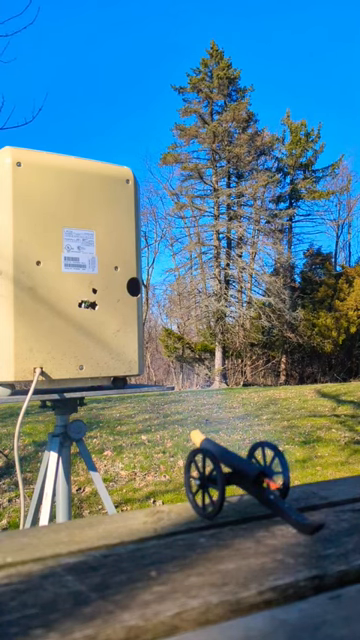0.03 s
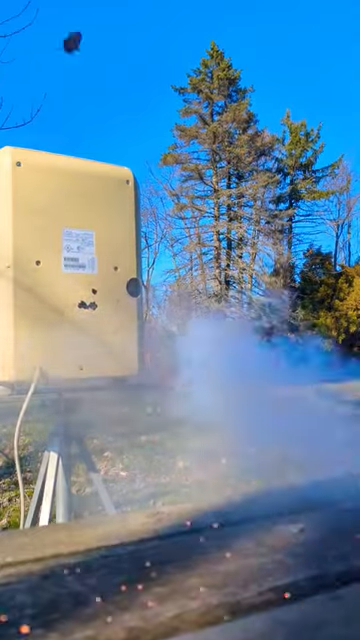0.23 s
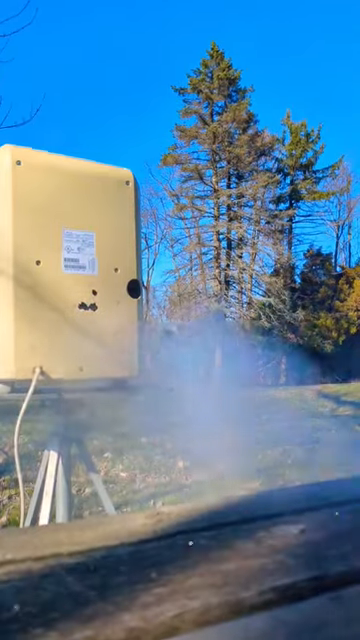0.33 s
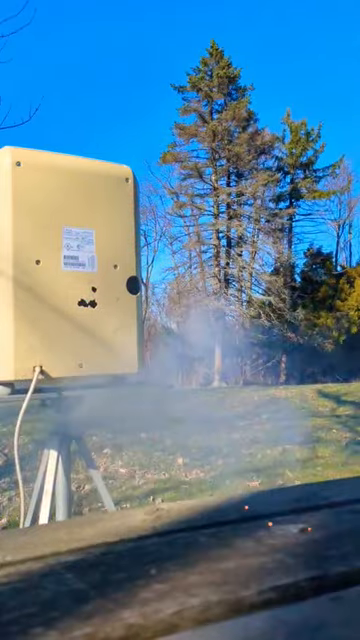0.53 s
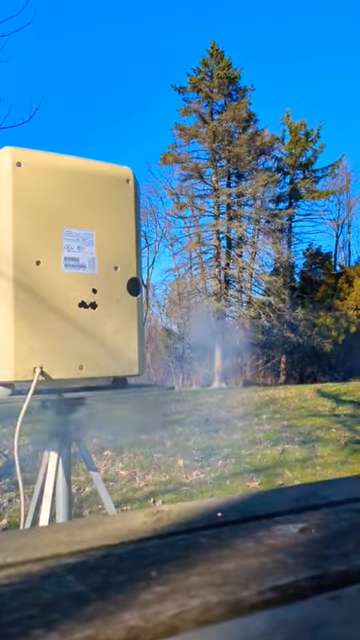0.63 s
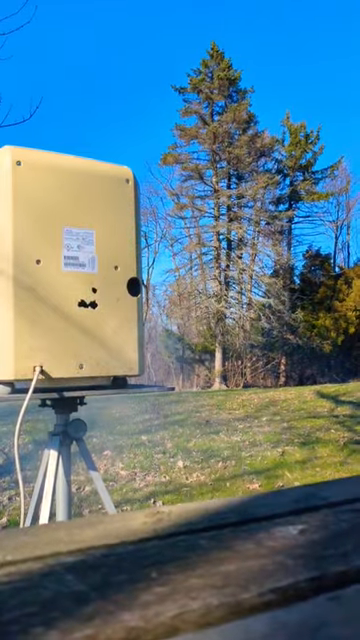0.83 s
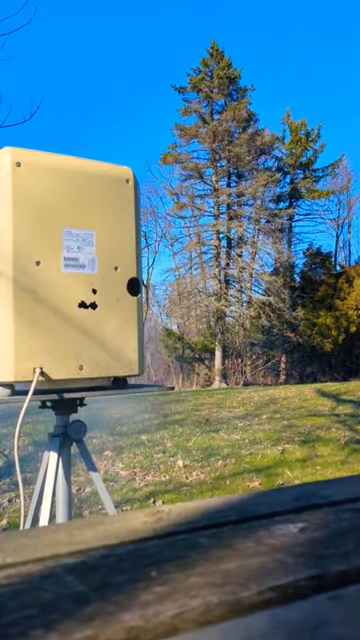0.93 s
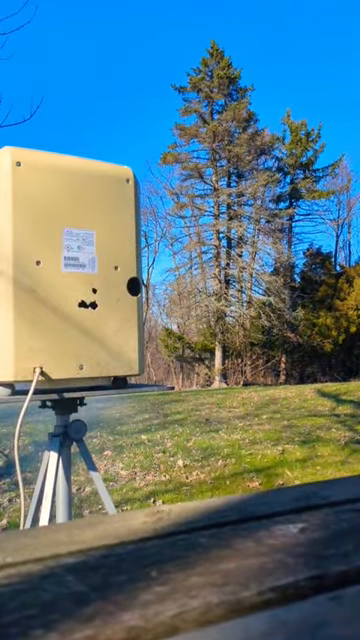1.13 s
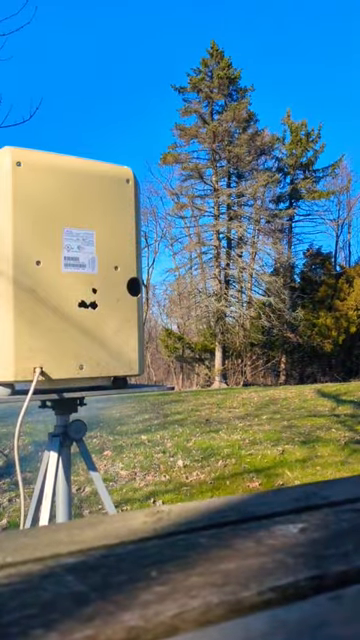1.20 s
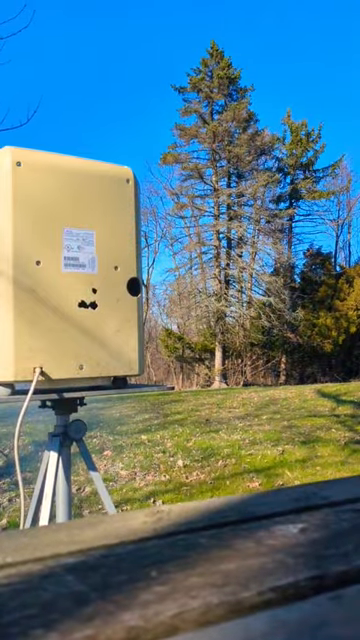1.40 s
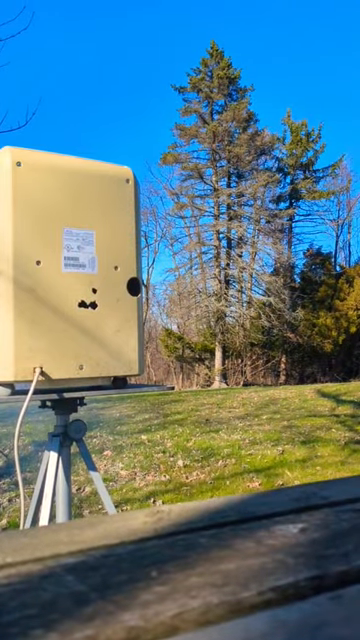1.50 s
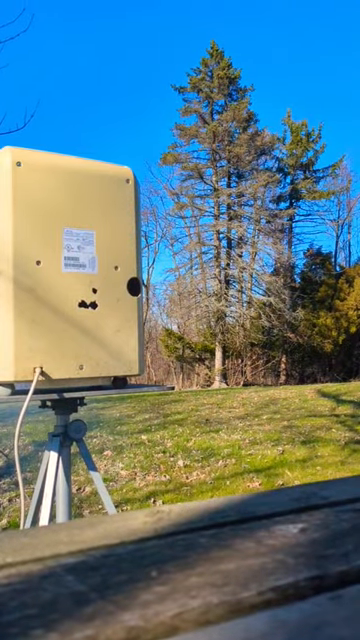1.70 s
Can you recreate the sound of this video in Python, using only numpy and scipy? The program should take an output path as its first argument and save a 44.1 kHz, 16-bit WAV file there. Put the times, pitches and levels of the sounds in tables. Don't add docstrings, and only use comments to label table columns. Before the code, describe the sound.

Small toy cannon shot: brief fuse hiss, loud crackling boom, wooden knocks, metal clinks, fading echo

```python
import sys
import numpy as np
from scipy import signal
from scipy.io import wavfile
from scipy.ndimage import uniform_filter1d

SR = 44100
rng = np.random.default_rng(int(sys.argv[2]) if len(sys.argv) > 2 else 0)


def boost_factor(decibels):
    exponent = np.asarray(decibels, float) / 20
    return 10 ** exponent


def int16_out(signal):
    q = np.round(np.clip(np.atleast_2d(signal).T, -1, 1) * 32767)
    wavfile.write(sys.argv[1], SR, q.astype(np.int16))


N = 77175


def in_time(rows):
    s, *columns = np.transpose(rows)
    return [np.interp(np.arange(N) / SR, s, c) for c in columns]


def rms_one(x):
    return x / np.sqrt(np.mean(x ** 2) + 1e-20)


def drift(rate):
    r = np.exp(-80 * np.pi * rate / SR)
    slow = signal.lfilter([1], [1, -2 * r, r * r], rng.standard_normal(N // 40 + 2002))[2000:]
    return np.interp(np.arange(N) / 40, np.arange(len(slow)), rms_one(slow))


def cut(x, hz, kind):
    return signal.sosfilt(signal.butter(2, min(hz, .45 * SR), kind, fs=SR, output="sos"), x)


def noise(low_hz, high_hz):
    return rms_one(cut(cut(rng.standard_normal(N), high_hz, "low"), low_hz, "high"))


def clicks(s, gain):
    out = np.full(N, 1e-18)
    np.add.at(out, (np.asarray(s) * SR).astype(int), gain)
    return out


def ring(x, hz, t60):
    r, w = boost_factor(-60 / (t60 * SR)), 2 * np.pi * hz / SR
    return signal.lfilter([0, np.sin(w)], [1, -2 * r * np.cos(w), r * r], x)


def dying(x, t60):
    return signal.lfilter([1], [1, -boost_factor(-60 / (t60 * SR))], x)


def banded(spectrum, patchy_db, rate, tilt_db=0, white=None):
    hz_at, db_at = np.transpose(spectrum)
    out, power = 0, 0
    together = drift(rate / 3)
    edges = 22 * 2 ** np.arange(0, 9.7, 1 / 3)
    white = rng.standard_normal((2, N)) if white is None else white
    for k, (low, high) in enumerate(zip(edges, edges[1:])):
        hz = np.sqrt(low * high)
        level_db = np.interp(np.log(hz), np.log(hz_at), db_at, left=-60)
        gain = boost_factor(level_db + tilt_db * np.log2(hz / 1000))
        band = signal.sosfilt(signal.butter(2, [low, high], "band", fs=SR, output="sos"), white[k % 2])
        flicker = boost_factor(patchy_db * (0.94 * together + drift(rate)))
        out = out + gain * flicker * band
        power = power + gain ** 2 * (high - low) / SR * 2
    return out / np.sqrt(power)


def shade(x, bumps):
    for hz, width_hz, db in bumps:
        b, a = signal.iirpeak(hz, hz / width_hz, fs=SR)
        x = x - (1 - boost_factor(db)) * signal.lfilter(b, a, x)
    return x


# f/Hz, level/dB per Hz
TRAFFIC = [(15, -64), (25, -54), (108, 4.5), (754, -13), (936, -7.5), (1650, -8.5), (3160, -34),
           (13600, -34), (16000, -39)]
# t/s, level/dB
TRAFFIC_SWELL = [
    (0, -7),
    (.3, 2.5),
    (1.3, 4.5),
    (1.45, 9),
    (1.75, 6.5),
]


def background(roar_db):
    swell_db, = in_time(TRAFFIC_SWELL)
    rumble = rms_one(cut(cut(cut(rng.standard_normal(N), 91.4, "low"), 91.4, "low"), 72, "high"))
    rumble_db = -52 + 0.18 * (np.maximum(roar_db, -65) + 59) + 4 * drift(4.4)
    traffic = boost_factor(-52.5 + swell_db) * banded(TRAFFIC, patchy_db=.8, rate=12)
    return traffic + boost_factor(rumble_db) * rumble


# t/s, level/dB
EMBERS = [
    (1.519, -38),
    (1.537, -43),
    (1.557, -44),
    (1.566, -47),
    (1.654, -45),
    (1.683, -52),
    (1.726, -42),
]


def embers():
    s, db = np.transpose(EMBERS)
    return cut(rng.standard_normal(N) * dying(clicks(s, boost_factor(db)), 0.0049), 11040, "high")


# from t/s, to t/s, start level/dB, fade/dB per s
SPINS = [
    (.52, 0.762, -37, 19),
    (.925, 1.034, -33.5, 38),
    (1.066, 1.424, -42.5, 28),
]


def wheel():
    ticks_per_s = 190
    beat = np.zeros(N)
    for start, end, db, fade in SPINS:
        s = start + np.cumsum(rng.uniform(.7, 1.3, 90)) / ticks_per_s
        size = boost_factor(db + rng.normal(0, 2.5, 90) - fade * (s - start))
        beat = beat + clicks(s[s < end], size[s < end])
    return cut(cut(rng.standard_normal(N) * dying(beat, .022), 4000, "high"), 12000, "low")


# t/s, level/dB, shift from body click to bright snap/dB, bounce level/dB
TICKS = [
    (0.211, -35, 11, 0),
    (0.896, -11.5, 8, -32),
    (1.0414, -13, 1.5, -22),
    (1.1111, -19.5, -2, -12.5),
    (1.409, -22, 15.5, -12),
    (1.430, -34, 9, -22),
    (1.5895, -27, 9, -9),
    (.9175, -27.5, 5, -20),
    (1.005, -34, -2, -20),
]
# f/Hz, level/dB, t60/s
TICK_BODY = [(2060, 5.5, 0.019), (3480, -2.5, 0.015), (5060, -9.5, 0.0073), (8180, -5.5, 0.005),
             (11000, -7, 0.0021), (13200, -10, 0.0024)]


def splinters():
    s, db, shift_db, bounce_db = np.transpose(TICKS)
    luck, out = rng.normal(0, 1.5, (len(s), 8)), 0
    for k, (hz, mode_db, t60) in enumerate(TICK_BODY):
        is_snap = hz > 4000
        gain = boost_factor(db + mode_db + luck[:, k] + (shift_db if is_snap else -shift_db) - 13.5)
        hit = clicks(s + 0.0018 * is_snap, gain) + clicks(s + 0.0087, gain * boost_factor(bounce_db))
        if is_snap:
            push = cut(dying(hit, 0.0089), 360, "low") * rng.standard_normal(N) * 0.61
        else:
            push = 2.67 * hit
        out = out + ring(push, hz, t60)
    tail = cut(dying(clicks(s, boost_factor(db - 14)), 0.072), 150, "low")
    return out + noise(2000, 11000) * tail


# t/s, wheel level/dB, axle level/dB, barrel level/dB, pin level/dB
CLINKS = [
    (0.498, -19, -56, -25.5, -37),
    (0.515, -28.5, -47, -21, -24),
    (.529, -42, -50, -20.5, -36),
    (0.555, -22, -54, -46, -39),
    (.586, -34, -31, -27, -68),
    (.904, -37, -28, -48, -50),
    (0.918, -33, -34, -38, -39),
    (.964, -32.5, -38, -26.5, -68),
    (1.072, -59, -43, -32, -77),
]
# f/Hz, t60/s
IRON_LOW = [(942, 0.48), (1922, 0.32), (2333, 0.079)]
# f/Hz, level/dB, t60/s
PIN = [(3752, -4, .05), (7311, -2, .06), (8651, -2, .14), (9679, -9, .04), (12460, -9, .04),
       (12880, -5, .09), (13560, -6, .05), (14840, -9, .05)]


def iron():
    s, *levels, pin_db = np.transpose(CLINKS)
    luck = rng.normal(0, 2.0, (len(s), 8))
    low = sum(ring(clicks(s, boost_factor(db)), hz, t60) for db, (hz, t60) in zip(levels, IRON_LOW))
    pin = 0
    for k, (hz, db, t60) in enumerate(PIN):
        pin = pin + ring(clicks(s, boost_factor(pin_db + db + luck[:, k])), hz, t60)
    crack = rng.standard_normal(N) * dying(clicks(s, boost_factor(pin_db + 5)), .025)
    return cut(cut(low, 5300, "low"), 370, "high") + cut(pin + crack, 3000, "high")


MUFFLED_S = [0.496, 0.567, 0.624, 0.703, 0.941, 0.986, 1.168]
MUFFLE_DB_PER_S = 892
# t/s, f/Hz, level/dB, t60/s
LONE_BLOWS = [(.302, 545, -17, .06), (.328, 930, -15, 0.062), (.364, 325, -9, 0.12),
              (0.376, 534, -14.5, 0.08), (.398, 1140, -8, 0.043), (.410, 477, -7.5, 0.18),
              (.428, 275, -9.5, 0.12), (0.455, 284, -10.5, 0.13), (0.457, 880, -9, 0.056),
              (0.488, 1280, -7.5, 0.061), (0.54, 3730, -20, 0.013), (0.556, 3800, -20, 0.022),
              (.586, 2770, -18.5, .02), (0.5856, 535.6, -9.5, 0.64), (0.5858, 880, -10, 0.014),
              (.508, 536, -18, .15), (.535, 521, -14, 0.41), (.52, 262.7, -17.5, 0.84),
              (.636, 637, -12, 0.19), (0.663, 1410, -18, 0.049), (.725, 1667, -22, 0.067),
              (.946, 752, -21, .12), (.876, 267, -13, 0.03), (0.877, 1290, -20.5, 0.045),
              (0.88, 1550, -21.5, 0.039), (.895, 2970, -19.5, 0.04), (0.897, 2460, -15.5, 0.022),
              (.895, 764, -15.5, 0.09), (.895, 361, -14.5, 0.094), (.908, 527.6, -17, 0.29),
              (.908, 625.7, -11.5, 0.28), (0.909, 1072, -14, 0.093), (.918, 2235, -20, 0.039),
              (0.965, 2524, -23, 0.022), (0.963, 136, -14, 0.11), (1.043, 820, -25, 0.049),
              (1.049, 163.6, -25, .2), (1.489, 123, -36, 0.18), (1.59, 350, -41.5, 0.23),
              (1.64, 367, -41.5, 0.14), (1.69, 124.5, -32, 0.094)]


def lone_blows():
    t, out = np.arange(N) / SR, 0
    rise_cycles = 0.39
    for s, hz, db, t60 in LONE_BLOWS:
        age = np.maximum(t - s, 0)
        end = min([m for m in MUFFLED_S if m > s] + [N / SR])
        fall_db = 60 * age / t60 + MUFFLE_DB_PER_S * np.maximum(t - end, 0)
        swell = 1 - np.exp(-age * hz / rise_cycles)
        out = out + boost_factor(db - fall_db) * swell * np.sin(2 * np.pi * hz * age)
    return out


# t/s, planks level/dB, carriage level/dB, crack level/dB
KNOCKS = [(.301, -37, -19.5, -7), (.328, -22, -18, -29), (0.368, -33, -23.5, -5.5), (.404, -34, -24.5, -25),
          (0.415, -19.5, -36, -41), (.438, -20.5, -40, -15), (0.461, -37, -45, -13), (.489, -38, -51, -36),
          (.508, -24, -17.5, -9), (0.527, -20.5, -23, -11), (0.543, -21, -20.5, -6.5),
          (0.557, -24, -20, -10), (.586, -19.5, -20.5, -19.5), (.626, -22, -22.5, -10.5),
          (.637, -45, -18, -14), (.657, -19.5, -24, -11), (.692, -18, -21, -28), (.676, -38, -32, -16),
          (.728, -31.5, -46, -13.5), (0.741, -31, -52, -19.5), (0.831, -37, -60, -23),
          (0.857, -38, -59, -26), (.876, -35.5, -43, -23), (.895, -29, -22, -13), (.909, -16, -22, -38),
          (.918, -20, -15.5, -22), (.950, -19.5, -32, -50), (.964, -22, -25, -32), (1.005, -30, -39, -25.5),
          (1.055, -38, -31, -33), (1.072, -60, -38, -48)]
# t/s, planks level/dB, carriage level/dB, crack level/dB
SETTLING = [
    (1.126, -45, -28.5, -40),
    (1.199, -48, -45.5, -32),
    (1.357, -45, -48.5, -39),
    (1.393, -44, -46.5, -54),
    (1.686, -47, -68, -73),
]
# f/Hz, level/dB, t60/s
PLANKS = [(90.2, -2.5, 0.74), (130.4, -5, 0.21), (164.4, -17, 0.16), (273, -2, 0.2), (357.2, 1, 0.096),
          (478.6, -3, 0.18)]
# f/Hz, level/dB, t60/s
CARRIAGE = [(534.9, 0, 0.36), (625, -1, 0.1), (673, -8, 0.13), (778, -4, 0.041), (1026, -2.5, 0.038),
            (1170, -7, 0.025)]


def tumble(roar_db):
    s, *levels, crack_db = np.transpose(KNOCKS + SETTLING)
    luck, sign = rng.normal(0, 1.5, (len(s), 12)), rng.choice([-1, 1], (len(s), 12))
    chatter_per_s, chatter_db = 38, (-18, -21)
    chatter = (rng.random(N) < chatter_per_s / SR) * rng.standard_normal(N) * boost_factor(roar_db)
    wood, k, t = 0, 0, np.arange(N) / SR
    for body, db, loose_db in zip((PLANKS, CARRIAGE), levels, chatter_db):
        for hz, mode_db, t60 in body:
            blows = clicks(s, sign[:, k] * boost_factor(db + mode_db + luck[:, k]))
            blows = blows + boost_factor(loose_db + mode_db) * chatter
            k += 1
            for start, end in zip([0] + MUFFLED_S, MUFFLED_S + [N / SR]):
                stretch = blows * (t >= start) * (t < end) + 1e-18
                stop = boost_factor(-MUFFLE_DB_PER_S * np.maximum(t - end, 0))
                wood = wood + ring(stretch, hz, t60) * stop
    wood = cut(wood, 1470, "low")
    wood = cut(cut(wood, 95.4, "high"), 95.4, "high")
    hits = clicks(s, boost_factor(crack_db - 11))
    crack = noise(590, 3000) * cut(dying(hits, 0.035), 300, "low")
    dull = rms_one(cut(cut(cut(rng.standard_normal(N), 2360, "low"), 2360, "low"), 170, "high"))
    yard = boost_factor(-18) * dull * cut(dying(hits, 0.79), 86, "low")
    return wood + crack + yard


# f/Hz, level/dB per Hz
FUSE = [(240, -43), (400, -6.5), (1760, -4), (2220, 2.5), (4180, -9.5), (6340, -0.5), (9320, -8.5),
        (13100, -8.5), (16000, -38)]
# f/Hz, width/Hz, level/dB
FUSE_SHADING = [(4280, 250, -24), (9350, 580, -5), (12870, 1300, 6), (14350, 700, -9)]


def fuse():
    steady_db, flare_db, out_s = -40, 11.5, 0.2463
    db, = in_time([(0, steady_db), (0.21, steady_db), (out_s, steady_db + flare_db), (out_s + 0.016, -120)])
    return boost_factor(db) * shade(banded(FUSE, patchy_db=1.2, rate=36), FUSE_SHADING)


# t/s, level/dB, t60/s, tilt/dB per octave
SPURTS = [
    (.237, -19, 0.072, 3.5),
    (.253, -18, 0.09, 0.5),
    (0.269, -21.5, 0.044, -0.5),
    (0.287, -38, 0.015, 16),
    (0.303, -38, 0.04, 5),
]


def ignition():
    t, out = np.arange(N) / SR, 0
    bright = rms_one(cut(cut(rng.standard_normal(N), 6200, "high"), 7900, "low"))
    dull = noise(330, 1530)
    for s, db, t60, tilt_db in SPURTS:
        envelope = cut(dying(clicks([s], boost_factor(db)), t60), 490, "low")
        out = out + envelope * (boost_factor(1.45 * tilt_db) * bright + boost_factor(-3 * tilt_db) * dull)
    thump_s, thump_hz, thump_length_s = 0.258, 51.5, 0.07
    phase = np.clip((t - thump_s) / thump_length_s, 0, 1)
    thump = np.sin(np.pi * phase) * np.sin(2 * np.pi * thump_hz * (t - thump_s))
    return out + boost_factor(-24.5) * thump


# t/s, level/dB, tilt/dB per octave
ROAR = [
    (0.234, -64, -2),
    (0.258, -17, 0.5),
    (0.296, -13.5, 5.5),
    (.4, -13, 0.14),
    (0.497, -11.5, -0.34),
    (0.507, -37.5, 1.5),
    (0.663, -21, -3),
    (0.819, -35.5, -1),
    (1.2, -46.5, -4.5),
]
# f/Hz, level/dB per Hz
ROAR_COLOUR = [(24, -52), (40, -25.5), (262, 2), (412, -7.5), (479, 0.5), (680, -4), (1150, -2),
               (6650, -20.5), (16000, -34.5)]


def roar():
    before = [(ROAR[0][0] - .01, -120, 0)]
    after = [(ROAR[-1][0] + 0.69, -80, -4)]
    db, tilt_db = in_time(before + ROAR + after)
    snaps_per_s, snap_share = 740, 0.61
    snap_gain = boost_factor(5 * np.minimum(rng.exponential(1, N), 4)) * rng.choice([-1, 1], N)
    snaps = (rng.random(N) < snaps_per_s / SR) * snap_gain
    white = np.sqrt(1 - snap_share) * rng.standard_normal((2, N)) + np.sqrt(snap_share) * rms_one(snaps)
    return boost_factor(db) * banded(ROAR_COLOUR, patchy_db=1.0, rate=40, tilt_db=tilt_db, white=white), db


def scene():
    blast, roar_db = roar()
    debris = embers() + wheel() + splinters()
    gun = iron() + lone_blows() + tumble(roar_db)
    return (background(roar_db) + debris + gun + fuse() + ignition() + blast)[None]


def band_limit(x):
    return signal.sosfilt(signal.butter(12, 16510, fs=SR, output="sos"), x)


# f/Hz, width/Hz, level/dB
MIC_DIPS = [(5790, 660, -6.5), (9930, 3300, -8)]


def record(dry):
    x = signal.sosfilt(signal.cheby2(10, 50, 16200, fs=SR, output="sos"), dry)
    x = shade(cut(cut(x, 36, "high"), 36, "high"), MIC_DIPS)
    limit_db, release_db_per_s, attack_s, clip_top = -3, 500, .001, 1.3
    fall = release_db_per_s * np.arange(N) / SR
    level_db = 20 * np.log10(np.abs(x[0]) + 1e-9)
    held_db = np.maximum.accumulate(level_db + fall) - fall
    over = np.maximum(held_db - limit_db, 0)
    ahead = int(attack_s * SR)
    x = x * boost_factor(-uniform_filter1d(np.roll(over, -ahead // 2), ahead))
    return band_limit(clip_top * np.tanh(x / clip_top))


dry = scene()
out = record(dry)
int16_out(out)
```